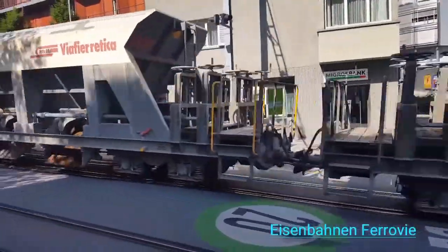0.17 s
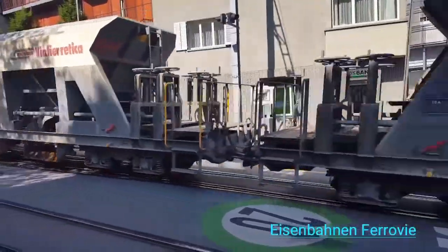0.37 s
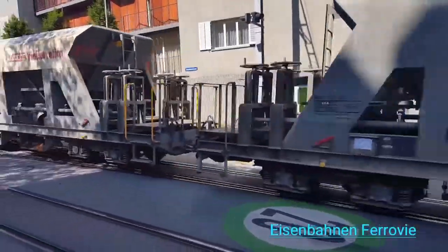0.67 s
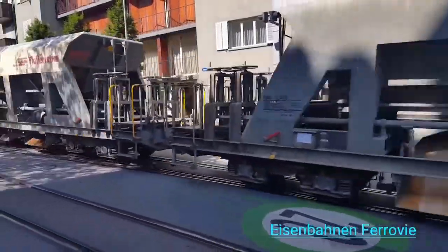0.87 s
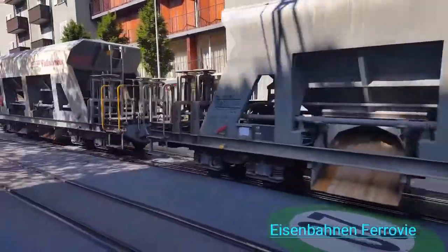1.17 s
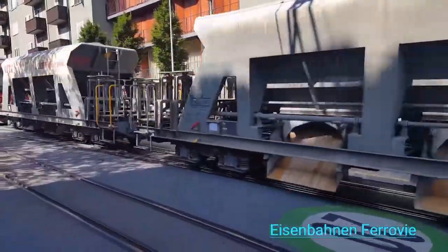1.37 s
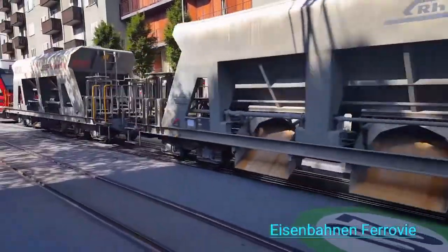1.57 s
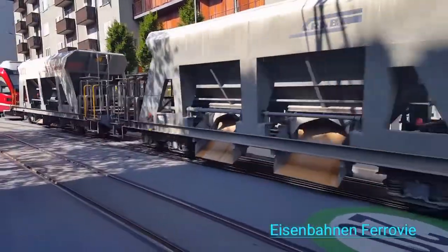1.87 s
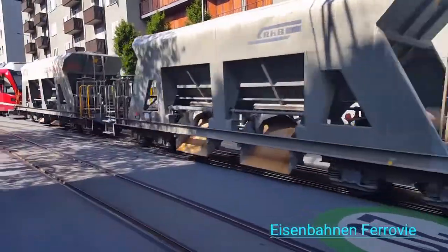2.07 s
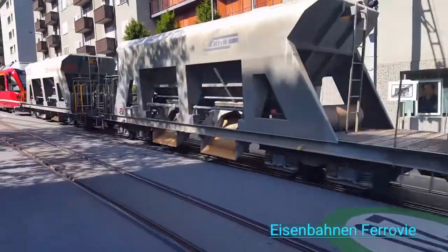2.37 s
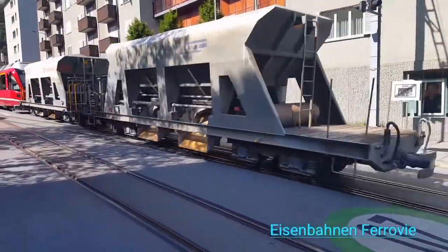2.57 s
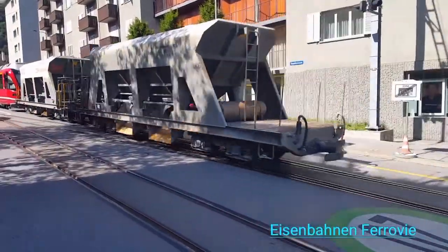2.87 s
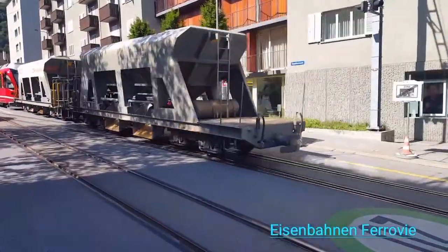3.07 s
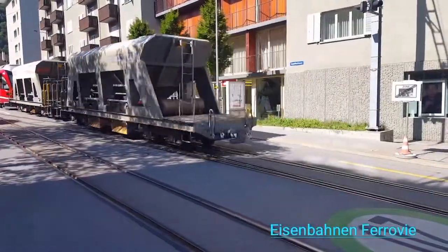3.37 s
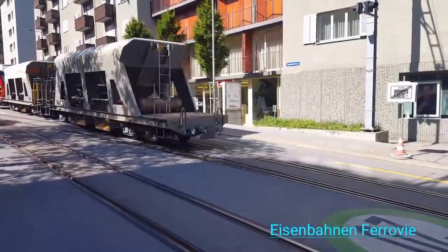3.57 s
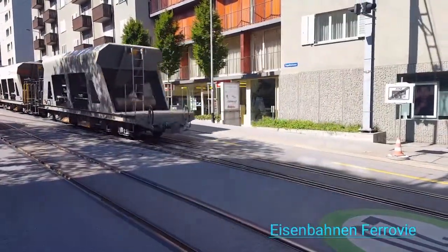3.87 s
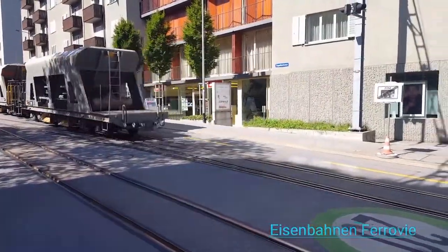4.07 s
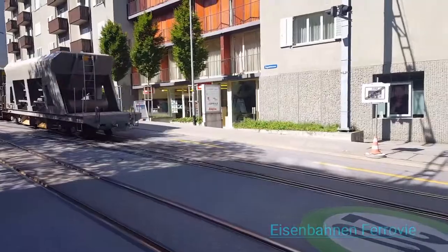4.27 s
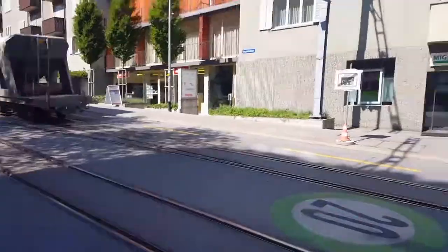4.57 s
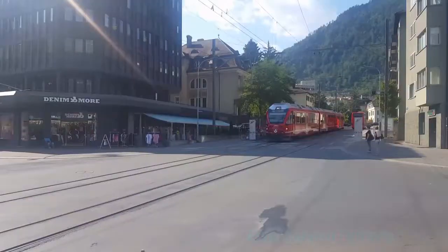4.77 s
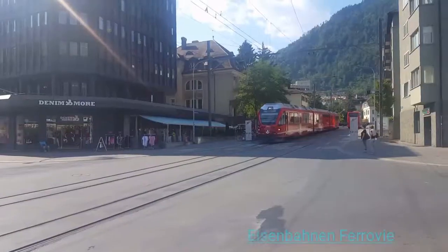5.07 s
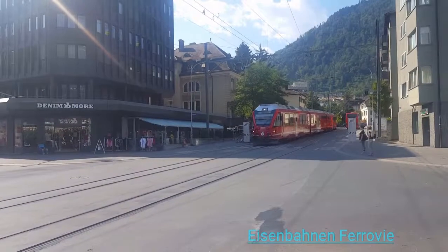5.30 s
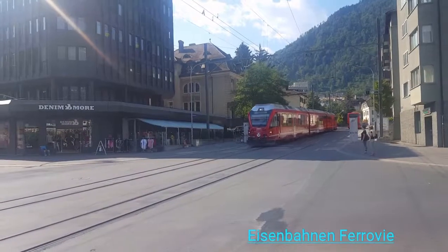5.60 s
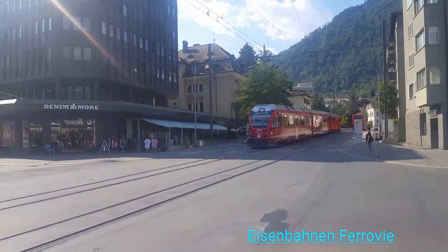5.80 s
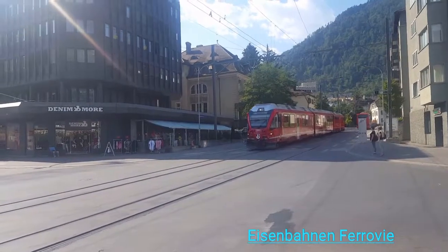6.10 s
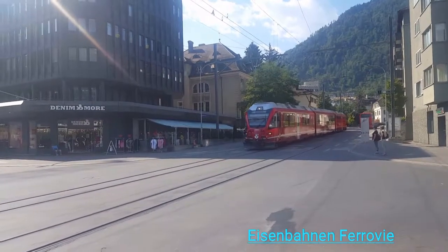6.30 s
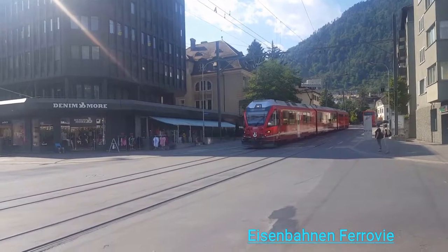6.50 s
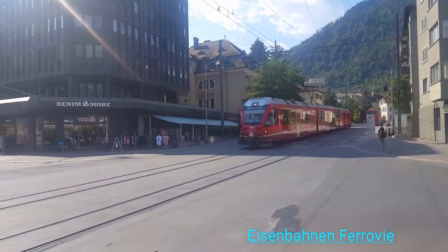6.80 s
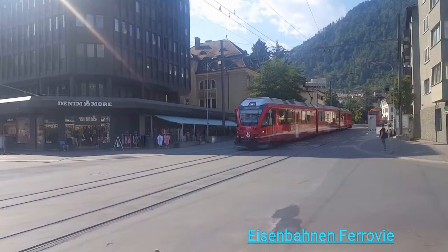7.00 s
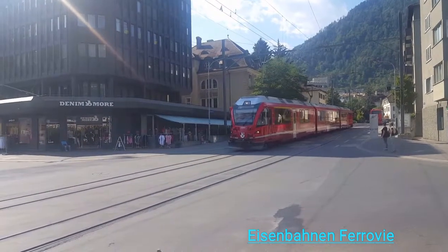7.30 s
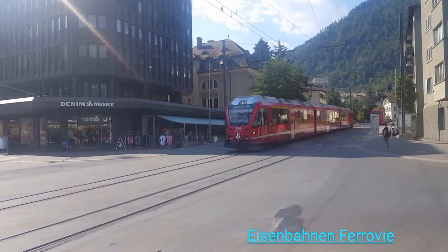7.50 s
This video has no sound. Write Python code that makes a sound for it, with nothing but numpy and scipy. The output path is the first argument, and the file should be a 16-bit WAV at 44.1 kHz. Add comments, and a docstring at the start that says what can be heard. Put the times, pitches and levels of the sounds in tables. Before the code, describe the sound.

Hopper wagons rumble past close by with ringing steel, clanks and crunching grit, then cut abruptly to a faint distant electric train, whining thinly.

```python
"""A street with rails sunk in the paving, then a wide square, house fronts all around both.
Hopper wagons roll past a few metres away: bodies rumble, wheels and rails ring, grit crunches, fittings clank.
They break off; after a moment near silence a distant electric train creeps closer, its converter whining
thinly over motor hum, with a few faint chirps. Two microphones a hand's width apart hear it all.
Rolling is shaped noise, clanks and thumps are dying bursts, whine and hum are wavering sine tones."""
import sys
import numpy as np
from scipy import signal
from scipy.fft import rfft, irfft, next_fast_len
from scipy.io import wavfile
from scipy.ndimage import uniform_filter1d

SR = 44100
rng = np.random.default_rng(int(sys.argv[2]) if len(sys.argv) > 2 else 0)


def int16_out(signal):
    """Quantize to a 16-bit WAV file."""
    q = np.round(np.clip(np.atleast_2d(signal).T, -1, 1) * 32767)
    wavfile.write(sys.argv[1], SR, q.astype(np.int16))


N = 337365
TIME = np.arange(N) / SR   # s
SIZE = next_fast_len(N, real=True)
FREQ = np.maximum(np.arange(SIZE // 2 + 1) * SR / SIZE, 1)   # Hz

WAGONS_END_S, RAILCAR_START_S = 4.621, 4.731
MIC_SPAN_MS = 0.49   # travel time of sound from one microphone to the other
RAILCAR_LAG_MS = -0.37   # a positive lag means that the left microphone hears it later
SWITCHING_HZ = 1011.4   # of the converter
# likeness of the two microphones in sound from all around, at each frequency
ALIKE = .985 * np.sinc(2 * FREQ * MIC_SPAN_MS / 1000)
# slope of the wagons' rolling noise: [f/Hz, level/dB per Hz]
ROLLING_SLOPE = [(25, -31), (45, -19.5), (72, -3), (140, 0), (185, -1), (300, 2), (355, 2), (480, -8.5),
                 (680, -10), (1100, -16), (2200, -17), (2800, -24), (6200, -31), (9700, -32.5),
                 (13000, -51.5)]


def wagons():
    """Rough wheels shake the hoppers and ring the steel; fittings rattle and grit is crushed in the groove."""
    # resonances of hoppers, wheels and rails: [f/Hz, width/Hz, level/dB over the rolling noise]
    steel_modes = [(144.5, 19, -2), (582, 7.3, 3.5), (950, 47, 1.5), (1279, 18, 6.5), (1510, 390, 2.5),
                   (2540, 77, 1.5), (3270, 630, 1), (3780, 290, 3.5), (4090, 180, 3), (4520, 60, 5),
                   (4950, 120, 6.5), (5230, 200, -3.5), (5720, 540, 2.5)]
    steel = colour(ROLLING_SLOPE, steel_modes)
    paths = bogie_paths()
    loss_db = distance_loss_db()
    # each layer suffers a share of the distance loss; the rest carries along the street
    roar_db = -18.5 - 0.38 * loss_db
    jolt = drift(10)   # uneven contact moves several bands together
    rolling = hopper_rumble(steel, paths, loss_db) + frame_drone(steel, paths, loss_db, jolt)
    rolling = rolling + wheel_roar(steel, paths, roar_db, jolt) + rail_hum(steel, paths, roar_db, loss_db)
    ringing_steel = groans() + hopper_tone(waver_db=1.5, wander=0.79) + squeals() + flange_ring(roar_db)
    impacts = rattle(steel, roar_db) + chatter(steel, roar_db) + pings(loss_db)
    return rolling + ringing_steel + impacts + scrapes() + grit_hiss(steel, paths, jolt)


def bogie_paths():
    """The wheels come from two directions: the last bogie sweeps past, the wagons ahead keep to their side."""
    # lag of the left microphone: [t/s, last bogie lag/ms, wagons ahead lag/ms]
    bogie_lags = [(0, 0.19, 0.19), (.7, 0.38, -0.13), (1.7, 0.41, -0.094), (2.35, 0.2, -0.17),
                  (3.1, 0.00039, -0.1), (3.8, -0.043, -0.15), (4.6, -0.25, -0.21)]
    last_ms, ahead_ms = in_time(bogie_lags)
    last_share = 0.58   # of the direct sound's power
    return [(last_share, last_ms), (1 - last_share, ahead_ms)]


def distance_loss_db():
    """Spreading loss of the last wagon: none until it has passed, then growing with its distance."""
    tail_passes_s, speed_m_per_s, track_distance_m = 1.57, 4.2, 6.26
    along_m = speed_m_per_s * np.maximum(TIME - tail_passes_s, 0)
    return 20 * np.log10(np.hypot(along_m, track_distance_m) / track_distance_m)


def hopper_rumble(steel, paths, loss_db):
    """The hoppers boom over the deepest rumble of the ground under the wheels, both fluctuating at random."""
    # the rumble swells or sinks briefly: [t/s, change of level/dB]
    rumble_swells = [(0.2, 0.5), (0.55, 0.5), (0.94, 1), (1.2, 1.5), (1.51, 1), (1.76, 2), (2.7, 2),
                     (3.04, -1), (3.3, 2), (3.47, 2), (4.23, 1), (4.55, 3)]
    swell_db = sum(db * swell(s, half_s=0.076) for s, db in rumble_swells)
    deep_db = -23 - 0.53 * loss_db + 1.6 * swell_db + drift(12)
    boom_db = -19.5 - 0.15 * loss_db + swell_db + 1.8 * drift(11)
    deep = from_db(deep_db) * street_noise(steel * band(15, 114), paths, direct=0.37)
    boom = from_db(boom_db) * street_noise(steel * band(89, 188), paths, direct=0.51)
    return deep + boom


def frame_drone(steel, paths, loss_db, jolt):
    """Low-mid noise of the wagon frames, shuddering as a wheel rides over rough patches."""
    # a rough patch: [t/s, change of level/dB]
    shudders = [(.2, 3.5), (.5, 4), (.83, 2.5), (1.3, 2.5), (1.58, 1), (1.82, -1), (2.05, 3), (2.23, 2),
                (2.49, 4), (2.79, 3), (3.27, 2), (3.85, 4.5), (3.96, 4), (4.55, 6)]
    shudder_db = sum(db * swell(s, half_s=0.063) for s, db in shudders)
    level_db = -18 - loss_db + shudder_db + .5 * jolt
    return from_db(level_db) * street_noise(steel * band(187, 418), paths, direct=0.26)


def wheel_roar(steel, paths, roar_db, jolt):
    """The rolling wheels roar through the middle of the spectrum."""
    return from_db(roar_db + 0.57 * jolt) * street_noise(steel * band(557, 3770), paths, direct=0.3)


def rail_hum(steel, paths, roar_db, loss_db):
    """The rails hum along the track, so against the roar they gain as the last wagon draws away."""
    rail_db = -12.5 + 1.2 * loss_db
    return from_db(roar_db + rail_db) * street_noise(steel * band(500, 850), paths, direct=0.4)


def groans():
    """The rails groan under a passing bogie: each groan is a swell of one broad resonance."""
    # [t/s, centre f/Hz, level/dB]
    groan_rows = [(.16, 646, -26), (.24, 780, -24.5), (.97, 615, -23), (1.15, 670, -23.5),
                  (1.36, 653.5, -26.5), (1.57, 680, -24), (1.9, 590, -23), (2.24, 635, -23),
                  (2.54, 680, -19.5), (2.72, 726, -25), (3.12, 616, -23), (3.15, 440, -23),
                  (3.28, 420, -24.5), (3.31, 655, -26), (3.5, 555, -18.5), (3.6, 720, -24.5),
                  (3.7, 870, -21.5), (4.56, 595, -20)]
    half_s, half_width_hz = 0.062, 77
    rings = rubs([(s, half_s, hz, half_width_hz, db) for s, hz, db in groan_rows])
    return to_time(rfft(rings, SIZE) * band(370, 1200))


def hopper_tone(waver_db, wander):
    """A hopper's lowest resonance stands out of the rumble as an unsteady tone."""
    # [t/s, f/Hz, level/dB before the 4.5 dB lift below]
    hopper_pitch = [(0, 137.6, -19), (.25, 140, -23), (.45, 146.4, -25), (.72, 136, -27), (.95, 143.1, -22),
                    (1.2, 142.2, -25.5), (1.5, 138.2, -25), (1.62, 148.5, -26.5), (1.75, 147, -23.5),
                    (2.2, 145.8, -24), (2.45, 140, -28.5), (3.15, 138.4, -24), (3.32, 138.5, -20.5),
                    (3.6, 143.6, -30), (3.77, 137.5, -19.5), (4.02, 142.4, -24.5), (4.12, 140.7, -23.5),
                    (4.27, 137.9, -18), (4.43, 135.3, -24.5), (4.6, 139.5, -24.5)]
    hz, db = in_time(hopper_pitch)
    phase = 2 * np.pi * np.cumsum(hz) / SR + wander * drift(6.6)
    return from_db(db + 4.5 + waver_db * drift(7.9)) * np.sin(phase)


def squeals():
    """The wheels ring thinly all the time, and louder whenever a flange bites the rail."""
    # main ring of the wheels: [f/Hz, half width/Hz, relative level/dB]
    wheel_modes = [(2340, 15, -7), (2367, 12, -10), (2412, 16, -6)]
    # flange bites: [t/s, half length/s, level/dB before the 1.5 dB trim below]
    bites = [(.13, .06, -34), (.75, 0.046, -35), (1.25, .07, -29), (1.4, 0.065, -37), (1.68, 0.038, -26),
             (1.816, 0.038, -28), (2.081, .025, -29), (2.2, .06, -32), (2.83, 0.022, -26),
             (2.981, 0.068, -32.5), (3.362, 0.037, -34), (3.97, 0.052, -30.5), (4.113, 0.066, -30),
             (4.437, .07, -33)]
    between_bites = from_db(-41)
    level = between_bites + sum(from_db(db - 1.5) * swell(s, half_s) for s, half_s, db in bites)
    return level * steady(echoing(ringing(wheel_modes) * band(2100, 2600)))


def flange_ring(roar_db):
    """Wheel modes sing out thinly as the flanges rub."""
    # [f/Hz, half width/Hz, relative level/dB]
    flange_modes = [(1275, 6.8, -7.5), (1982.4, 14, -4), (2237, 20, -7), (3130, 51, -12.5), (5180, 34, -20)]
    # [t/s, level/dB against the roar, before the 1.5 dB trim below]
    flange_level = [(0, -17), (.4, -17), (.9, -11), (1.8, -16), (3.0, -10.5), (3.3, -9), (3.6, -10.5),
                    (3.9, -8), (4.6, -25)]
    flange_db, = in_time(flange_level)
    return from_db(roar_db + flange_db - 1.5 + 2 * drift(11)) * echoing(ringing(flange_modes))


def rattle(steel, roar_db):
    """Loose fittings rattle at random and couplings clank, each impact a dying burst of steel noise."""
    # couplings and fittings knock: [t/s, relative peak level/dB]
    clanks = [(0.0954, -2.5), (0.4519, -8), (1.4666, -3), (1.5409, -13.5), (1.6754, -22), (1.9354, -12),
              (2.0564, -6), (2.0884, -14), (3.1434, -8), (3.1792, -4.5), (4.1184, -10)]
    loose = from_db(roar_db - 11) * grains(per_s=90, spread_db=16, t60=0.41)
    knocks = loose + from_db(-14.5) * blows(clanks, t60=0.12)
    return knocks * echoing(steel * band(1010, 5800))


def chatter(steel, roar_db):
    """Wheels hop on the rough rail head; each contact mixes low, middle and high rings of the steel."""
    per_s, t60_s = 55, 0.057
    common = grains(per_s, spread_db=7.5, t60=t60_s)
    rings = 0
    for low_hz, high_hz in ((520, 1100), (1100, 1300), (1800, 3500)):
        contacts = common + grains(per_s, spread_db=12, t60=t60_s)
        rings = rings + contacts * echoing(steel * band(low_hz, high_hz))
    return from_db(roar_db - 12) * rms_one(rings)


def pings(loss_db):
    """Loose steel parts ring briefly at random pitches, following the rolling noise's slope in strength."""
    count, low_hz, high_hz, t60_s, level_db = 300, 280.8, 2620, 0.27, -17.5
    out, t = np.zeros((2, N)), np.arange(SR // 4) / SR
    shape = from_db(-60 * t / t60_s) * np.minimum(t / .004, 1)   # 4 ms attack
    slope_hz, slope_db = np.transpose(ROLLING_SLOPE)
    for when, pitch, size, place in rng.random((count, 4)):
        hz = low_hz * (high_hz / low_hz) ** pitch
        db = level_db + np.interp(np.log(hz), np.log(slope_hz), slope_db) - 8 * size
        lag_s = np.array([[-1], [1]]) * (place - .5) * MIC_SPAN_MS / 1000
        start = int(when * WAGONS_END_S * SR)
        out[:, start:start + len(t)] += from_db(db) * shape * np.sin(2 * np.pi * hz * (t + lag_s))
    return from_db(-.7 * loss_db) * out


def scrapes():
    """A wheel tread grinds over grit: each scrape is a grainy swell of one broad ring of wheel and rail."""
    # [t/s, half length/s, centre f/Hz, level/dB]
    scrape_rows = [(0.105, 0.042, 1500, -19.5), (0.37, .04, 1700, -25), (.45, 0.033, 4200, -29.5),
                   (.56, .07, 1300, -28), (0.873, .05, 4500, -29), (.9, .09, 1297, -29),
                   (1.206, 0.056, 3630, -26.5), (1.545, .025, 2000, -36), (2.26, .02, 2500, -29),
                   (2.54, .04, 1200, -29), (2.826, 0.022, 3880, -30.5), (2.94, .025, 4280, -30.5),
                   (3.2, 0.14, 1598, -34), (3.22, .12, 3700, -35), (3.43, .03, 1500, -29.5),
                   (4.38, .04, 4200, -34)]
    width_share = .16   # half width over centre frequency
    rings = rubs([(s, half_s, hz, width_share * hz, db) for s, half_s, hz, db in scrape_rows])
    return grains(per_s=510, spread_db=14.5, t60=.02) * to_time(rfft(rings, SIZE) * band(800, 6500))


def grit_hiss(steel, paths, jolt):
    """Grit crushed in the groove: bright noise with fine random crunches on it."""
    # [t/s, level/dB before the 1.5 dB trim below]
    grit_level = [(0, -27.5), (.1, -24), (.22, -27.5), (.45, -23), (.66, -26.5), (.8, -26), (1.2, -26.5),
                  (1.36, -28.5), (1.57, -25), (1.8, -27), (2.15, -28.5), (2.74, -27.5), (2.92, -27),
                  (3.02, -29), (3.3, -28.5), (4.1, -31), (4.29, -32), (4.42, -30), (4.52, -34.5),
                  (4.555, -25.5), (4.6, -30.5)]
    grit_db, = in_time(grit_level)
    crunch = 1 + from_db(-17) * grains(per_s=120, spread_db=26, t60=0.03)
    hiss = street_noise(steel * band(2920, 18000), paths, direct=0.17)
    return from_db(grit_db - 1.5 + 0.66 * jolt) * crunch * hiss


def cracks():
    """Short bright snaps, as of grit, each a dying burst of treble noise."""
    # [t/s, level/dB]
    snaps = [(2.819, -25), (5.302, -52.5), (5.329, -49), (6.545, -55), (6.79, -56), (7.405, -53)]
    return blows(snaps, t60=0.089) * echoing(band(5000, 8800))


def railcar():
    """The far train: rolling noise and town rumble, motor and gear hum, whine, a clack, thumps and chirps."""
    # its rolling noise and the town around it: [f/Hz, level/dB per Hz]
    distant_slope = [(25, -9), (60, -3.5), (130, 3.5), (230, -0.5), (420, -10.5), (640, -9.5), (850, -13),
                     (1500, -15.5), (2700, -25), (3700, -30.5), (5000, -39), (7300, -40.5), (9700, -43),
                     (13000, -50)]
    # housings of motors and converter ring around the whine: [f/Hz, width/Hz, level/dB over the rolling noise]
    housings = [(1070, 310, 4.5), (1270, 150, -3), (2005, 90, 9.5), (4000, 72, 9), (6040, 190, 4.5),
                (8100, 190, 5), (8940, 480, 7), (10200, 320, 7)]
    # its low end before each layer's trim: [t/s, rumble level/dB, motor drone level/dB]
    far_bass = [(4.75, -37.5, -45), (4.98, -39, -42.5), (5.13, -36, -34), (5.25, -34.5, -39),
                (5.46, -35.5, -34), (5.58, -42, -36), (5.68, -37, -31.5), (5.8, -38, -37),
                (5.92, -39, -44.5), (6.05, -37, -33.5), (6.19, -47.5, -40), (6.28, -37, -44.5),
                (6.42, -35, -44), (6.58, -36, -33.5), (6.74, -37.5, -47), (6.91, -34.5, -34.5),
                (7.07, -40.5, -32.5), (7.15, -40, -38), (7.27, -40, -36), (7.48, -37.5, -36.5),
                (7.65, -36, -38)]
    rumble_db, motor_db = in_time(far_bass)
    far = colour(distant_slope, housings)
    elapsed = TIME - RAILCAR_START_S
    approach_db = 0.42 * elapsed   # it grows as the train nears
    onset_db = -4 * np.clip(1 - elapsed / 0.42, 0, 1)   # a little softer at first
    rolling_db = -34.5 + approach_db + onset_db
    noise = far_rolling(far, rumble_db, motor_db, rolling_db, approach_db)
    one_side = arriving(motor_hum(motor_db) + gear_tones(rolling_db) + thumps(far), RAILCAR_LAG_MS)
    return noise + whine() + one_side + high_gears(elapsed) + clack() + chirps()


def far_rolling(far, rumble_db, motor_db, rolling_db, approach_db):
    """Distant noise in four bands: rumble, motor drone, rolling, and a faint air heard from all around."""
    path = [(0.96, RAILCAR_LAG_MS)]
    rumble = from_db(rumble_db + 1) * street_noise(far * band(15, 148), path, direct=0.22)
    drone = from_db(motor_db - 5) * street_noise(far * band(197, 370), path, direct=0.88)
    rolling_db = rolling_db - 0.4 + 0.64 * drift(8.1)
    rolling = from_db(rolling_db) * street_noise(far * band(287, 5850), path, direct=0.45)
    air = from_db(-52 + approach_db + drift(18)) * echoing(far * band(2800, 14000))
    return rumble + drone + rolling + air


def whine():
    """Converter switching sings in the motors: a main line, its overtones, and sidebands from motor current."""
    # main line, before trim and pan: [t/s, level/dB]
    whine_level = [(4.75, -50), (4.8, -55.5), (4.85, -39.5), (4.89, -56), (4.95, -56), (4.99, -46.5),
                   (5.06, -40), (5.18, -52.5), (5.27, -42.5), (5.35, -49.5), (5.58, -46.5), (5.76, -46),
                   (5.82, -49), (5.9, -43.5), (6.2, -43), (6.48, -44.5), (6.52, -43), (6.56, -50.5),
                   (6.62, -42), (6.75, -45), (7.0, -55), (7.04, -42.5), (7.11, -64), (7.23, -43),
                   (7.47, -49), (7.65, -45.5)]
    # overtones come and go as the train moves: [t/s, 4th level/dB, 6th level/dB, 8th level/dB]
    overtone_levels = [(4.75, -72, -78, -85), (5.1, -70, -82, -83), (5.4, -70, -81, -85),
                       (5.68, -72, -86, -87), (5.88, -67, -75, -68), (6.1, -66.5, -71, -76),
                       (6.3, -68.5, -72, -77), (6.52, -68, -66, -71), (6.68, -70, -77, -76),
                       (6.83, -67, -70.5, -70), (6.95, -67, -79, -79.5), (7.08, -68, -75, -74),
                       (7.32, -61, -70.5, -69), (7.5, -59, -70, -73), (7.65, -68, -76, -79)]
    # sidebands of the main line: [f/Hz off its pitch, relative level/dB]
    sidebands = [(-131, -17), (97.5, -22)]
    # lines on either side: [multiple of the switching rate, lower level/dB, upper level/dB], at mid-passage
    beat_lines = [(2, -64, -64), (4, -72, -74), (6, -75, -79), (8, -80, -82)]
    motor_beat_hz = 39.3
    main_db, = in_time(whine_level)
    fourth_db, sixth_db, eighth_db = in_time(overtone_levels)
    pan_db = 2.5 * np.array([[.5], [-.5]])   # louder on the left
    out = far_line(2 * SWITCHING_HZ, main_db - 0.3 + pan_db, flutter_db=1.6, wander=.27)
    tenth_db = eighth_db - 7.5
    for multiple, db in ((4, fourth_db), (6, sixth_db), (8, eighth_db), (10, tenth_db)):
        out = out + far_line(multiple * SWITCHING_HZ, db, flutter_db=5, wander=.55)
    fading_db = -2 * (TIME - (RAILCAR_START_S + TIME[-1]) / 2)   # the beat lines sink by 2 dB per s
    for multiple, lower_db, upper_db in beat_lines:
        for side, db in ((-1, lower_db), (0.99, upper_db)):
            hz = multiple * SWITCHING_HZ + side * motor_beat_hz
            out = out + far_line(hz, db + fading_db, flutter_db=4.5, wander=.5)
    side_lines = [(2 * SWITCHING_HZ + off_hz, db) for off_hz, db in sidebands]
    side_gain = from_db(-37.5 + .5 * (main_db - main_db.mean()))   # follows the main line by half
    return out + arriving(side_gain * tones(side_lines, waver_db=7, wander=1.3), RAILCAR_LAG_MS)


def far_line(hz, db, flutter_db, wander):
    """One line of the whine (dB rms); shifting echoes make it flutter differently at each microphone."""
    arrival = TIME + np.array([[-1], [1]]) * RAILCAR_LAG_MS / 2000
    phase = 2 * np.pi * (hz * arrival % 1) + wander * drift(12)
    flutter = flutter_db * np.array([drift(11), drift(21)])
    return np.sqrt(2) * from_db(db + flutter) * np.sin(phase.astype(np.float32))


def motor_hum(motor_db):
    """The motors hum in low steady tones that follow the drone's level."""
    # [f/Hz, relative level/dB]
    hum_lines = [(60, -6.5), (102, -9.5), (198, -4), (215.5, -0.5), (237, -8.5), (270, -13.5), (301, -17),
                 (321, -10)]
    return from_db(motor_db - 1) * tones(hum_lines, waver_db=1.8, wander=0.55)


def gear_tones(rolling_db):
    """Gear mesh tones that follow the rolling noise, and the clearest of them at a level of its own."""
    # [f/Hz, relative level/dB]
    gear_lines = [(630, -6.5), (662, -3.5), (691, -17), (866, -8.5)]
    mesh = from_db(rolling_db - 8.5) * tones(gear_lines, waver_db=3.2, wander=0.91)
    return mesh + tones([(747, -51.5)], waver_db=3.2, wander=0.76)


def high_gears(elapsed):
    """Higher gear tones come back off the house fronts from another side, growing as the train nears."""
    # [f/Hz, level/dB at the start]
    high_lines = [(1048, -59), (1067, -64), (1092, -62), (1126, -61.5)]
    growing = from_db(3.6 * elapsed)   # 3.6 dB per s
    return arriving(growing * tones(high_lines, waver_db=3.2, wander=2.5), lag_ms=-.1)


def clack():
    """A nearer quick double knock with a woody middle and a bright edge."""
    # [t/s, level/dB]
    clack_blows = [(4.897, -32.5), (4.909, -32)]
    # its colour: [f/Hz, level/dB per Hz]
    clack_slope = [(100, -7.5), (280, -4), (450, 1.5), (650, -10), (1030, -10), (1900, -21), (3300, -17.5),
                   (4600, -27.5), (6000, -33.5), (13000, -57)]
    return blows(clack_blows, t60=0.14) * echoing(colour(clack_slope))


def thumps(gain):
    """Dull low thumps, as of wind on the microphones: each is a dying noise burst."""
    # [t/s, level/dB, bottom edge f/Hz, top edge f/Hz]
    thump_rows = [(5.849, -27, 80, 150), (6.045, -27, 150, 300), (6.592, -21.5, 150, 350),
                  (7.059, -26, 149.2, 280), (7.215, -26, 150, 300)]
    out = 0
    for s, db, bottom_hz, top_hz in thump_rows:
        burst = blows([(s, db)], t60=0.1) * rng.standard_normal(N)
        out = out + rfft(burst, SIZE) * rms_one(gain * band(bottom_hz, top_hz))
    return to_time(out)


def chirps():
    """Faint chirps across the square: each is a brief gliding tone."""
    # [t/s, f/Hz, glide/Hz per s, level/dB]
    chirp_rows = [(6.3, 2860, 2999.5, -48), (6.52, 3470, 4998.5, -51), (6.72, 3370, 7000.5, -55),
                  (6.847, 3320, 4000, -48), (7.1, 2640, -5000, -49), (7.36, 3170, 6000, -54),
                  (7.52, 3500, 2000, -54)]
    out = 0
    for s, hz, glide, db in chirp_rows:
        t = TIME - s
        out = out + from_db(db) * swell(s, half_s=.013) * np.sin(2 * np.pi * t * (hz + glide * t / 2))
    return out


def low_floor():
    """A very faint low noise from all around, under everything."""
    return from_db(-72) * echoing(band(10, 60))


def street_noise(gain, paths, direct):
    """Level noise: a direct power share along paths of (power share, lag ms), and echoes off the house fronts."""
    straight = 0
    for part, lag_ms in paths:
        straight = straight + np.sqrt(direct * part) * arriving(rms_one(to_time(gain * white())), lag_ms)
    return steady(straight + np.sqrt(1 - direct) * echoing(gain))


def echoing(gain):
    """Stereo noise of rms 1 from all around: the microphones hear it alike only in the bass."""
    mid = to_time(gain * np.sqrt(1 + ALIKE) * white())
    side = to_time(gain * np.sqrt(1 - ALIKE) * white())
    return rms_one(np.array([mid + side, mid - side]))


def arriving(x, lag_ms):
    """A sound from one side reaches the two microphones at different times."""
    return np.array([np.interp(TIME + side * lag_ms / 2000, TIME, x) for side in (-1, 1)])


def tones(lines, waver_db, wander):
    """Machine tones, each swelling and wandering in phase (radians) on its long way."""
    out = 0
    for hz, db in lines:
        phase = 2 * np.pi * hz * TIME + wander * drift(3)
        out = out + from_db(db + waver_db * drift(3.1)) * np.sin(phase)
    return out


def rubs(rows):
    """Each row (t/s, half length/s, f/Hz, half width/Hz, level/dB) is a swell of friction in one resonance."""
    out, friction = np.zeros((2, N)), echoing(1)
    for s, half_s, hz, half_width_hz, db in rows:
        near = slice(max(int((s - 4 * half_s) * SR), 0), int((s + 4 * half_s) * SR))
        envelope = from_db(db) * np.exp(-((TIME[near] - s) / half_s) ** 2)
        out[:, near] += envelope * resonate(friction[:, near], hz, half_width_hz)
    return out


def resonate(x, hz, half_width_hz):
    """One broad resonance; white noise keeps its rms."""
    r = np.exp(-2 * np.pi * half_width_hz / SR)
    poles = [1, -2 * r * np.cos(2 * np.pi * hz / SR), r * r]
    return np.sqrt((1 - r * r) / 2) * signal.lfilter([1, 0, -1], poles, x + 1e-18)


def blows(rows, t60):
    """Envelope that jumps at each (t/s, level/dB) and dies away by 60 dB in t60 seconds."""
    kicks = np.zeros(N)
    for s, db in rows:
        kicks[int(s * SR)] += from_db(db)
    return dying(kicks, t60)


def grains(per_s, spread_db, t60):
    """Envelope of many small random impacts that die away; rms 1."""
    kicks = (rng.random(N) < per_s / SR) * from_db(spread_db * rng.random(N))
    return rms_one(dying(kicks, t60))


def dying(kicks, t60):
    """Exponential decay after each kick."""
    return signal.lfilter([1], [1, -from_db(-60 / (t60 * SR))], kicks + 1e-18)


def swell(s, half_s):
    """Envelope that rises and falls smoothly around a moment."""
    return np.exp(-((TIME - s) / half_s) ** 2)


def drift(hz):
    """Slow chance with spread 1: noise through two equal low-pass poles, drawn at every 40th sample."""
    r = np.exp(-80 * np.pi * hz / SR)
    slow = signal.lfilter([1], [1, -2 * r, r * r], rng.standard_normal(N // 40 + 2002))[2000:]
    return np.interp(np.arange(N) / 40, np.arange(len(slow)), rms_one(slow))


def colour(points, resonances=()):
    """Gain on FREQ: a smooth slope with resonance peaks standing on it."""
    hz, db = np.transpose(points)
    peaks = sum(lift / (1 + (2 * (FREQ - centre) / width) ** 2) for centre, width, lift in resonances)
    return from_db(np.interp(np.log(FREQ), np.log(hz), db) + peaks)


def ringing(modes):
    """Gain on FREQ of narrow resonances, falling away between them."""
    return sum(from_db(db) / (1 + ((FREQ - hz) / width) ** 2) for hz, width, db in modes)


def band(low_hz, high_hz):
    """Gain on FREQ of a band with soft edges."""
    return 1 / np.sqrt((1 + (low_hz / FREQ) ** 8) * (1 + (FREQ / high_hz) ** 8))


def steady(x):
    """Hold the level of a noise near rms 1, so that its control curve makes it surge."""
    return x / np.sqrt(uniform_filter1d(np.mean(x ** 2, axis=0), size=SR // 7) + 1e-12)


def white():
    """Spectrum of fresh white noise."""
    return rng.standard_normal(2 * len(FREQ), dtype=np.float32).view(np.complex64)


def to_time(spectrum):
    """Spectrum on FREQ to samples."""
    return irfft(spectrum.astype(np.complex64), SIZE)[..., :N]


def in_time(rows):
    """Each column of a curve table at every sample."""
    s, *columns = np.transpose(rows)
    return [np.interp(TIME, s, c) for c in columns]


def from_db(db):
    """Decibels to gain."""
    return 10 ** (np.asarray(db) / 20)


def rms_one(x):
    """Scale to rms 1."""
    return x / np.sqrt(np.mean(x ** 2) + 1e-20)


def scene():
    """The wagons close by, a short near silence, then the far train; snaps and a faint floor run through."""
    first = np.clip((WAGONS_END_S - TIME) / .004, 0, 1)   # 4 ms fades
    second = np.clip((TIME - RAILCAR_START_S) / .004, 0, 1)
    return first * wagons() + second * railcar() + cracks() + low_floor()


def record(dry):
    """Each microphone adds its colour, the highest peaks are clipped under full scale and the top is cut."""
    # the microphones differ a little in colour: [f/Hz, left minus right level/dB]
    mic_balance = [(100, 0), (200, -0.5), (370, -0.5), (670, 1.5), (1240, -0.5), (2260, 0.5), (4140, -1),
                   (7590, -0.5), (13900, 4.5)]
    tilt = np.sqrt(colour(mic_balance))   # half the difference on each side
    coloured = to_time(rfft(dry, SIZE) * np.array([tilt, 1 / tilt]))
    held = np.clip(coloured, -.97, .97)
    top_cut = signal.ellip(10, .2, 80, 13800, fs=SR, output="sos")   # cutoff in Hz
    return signal.sosfilt(top_cut, held)


dry = scene()
out = record(dry)
int16_out(out)
```